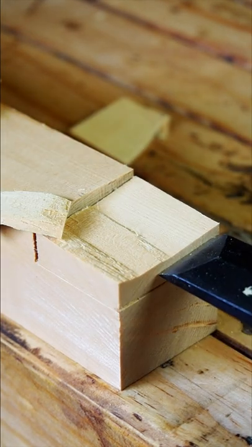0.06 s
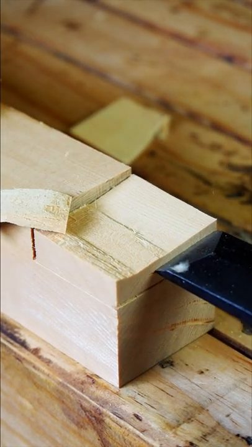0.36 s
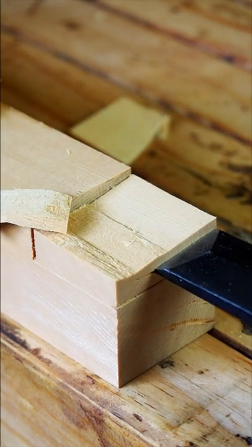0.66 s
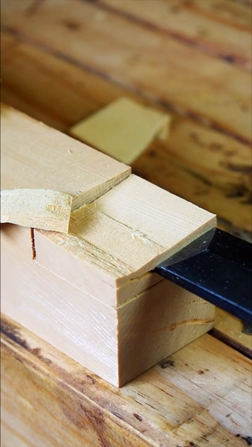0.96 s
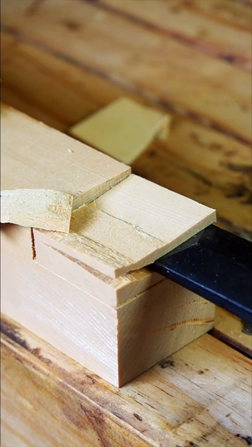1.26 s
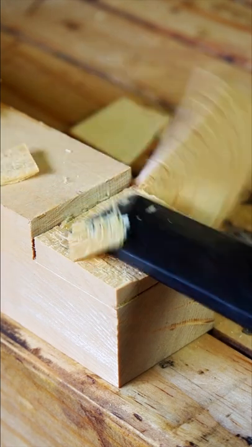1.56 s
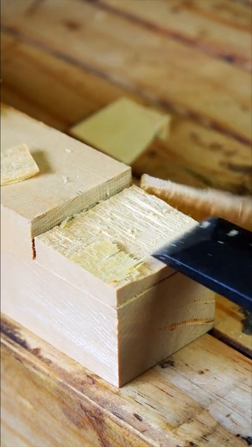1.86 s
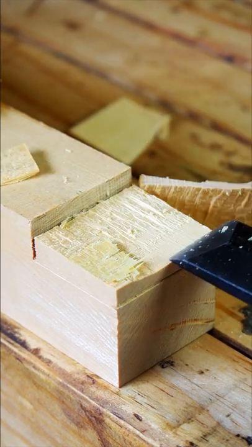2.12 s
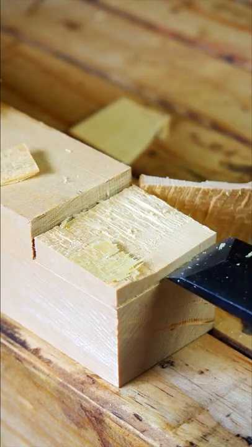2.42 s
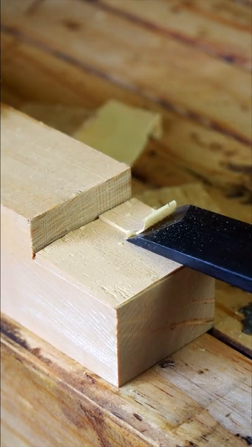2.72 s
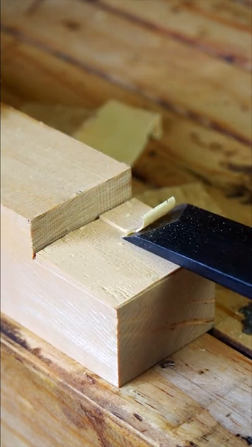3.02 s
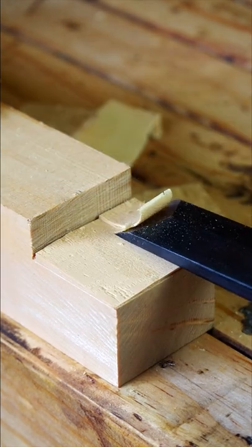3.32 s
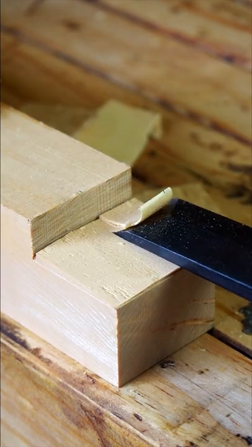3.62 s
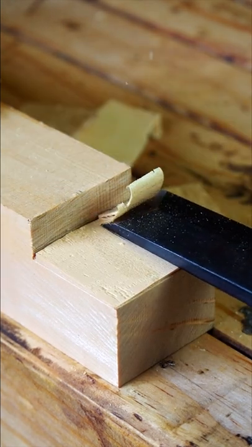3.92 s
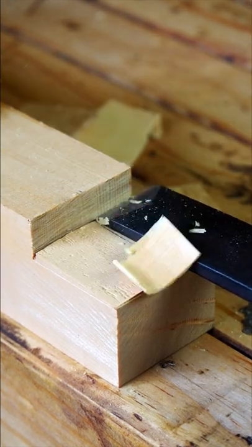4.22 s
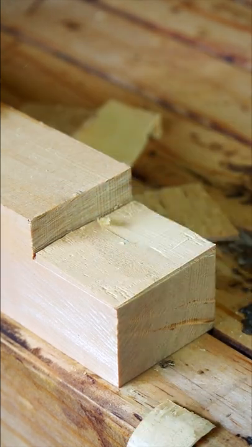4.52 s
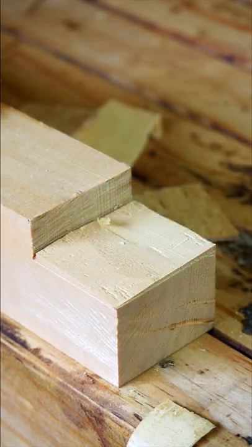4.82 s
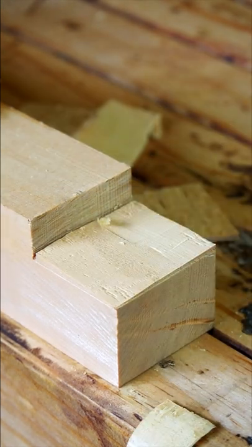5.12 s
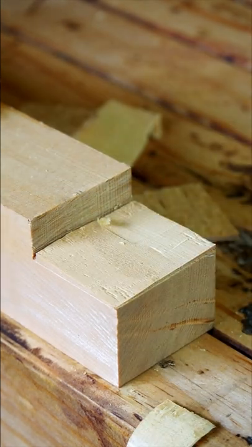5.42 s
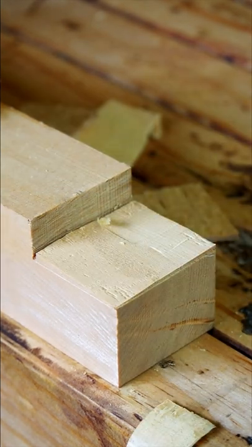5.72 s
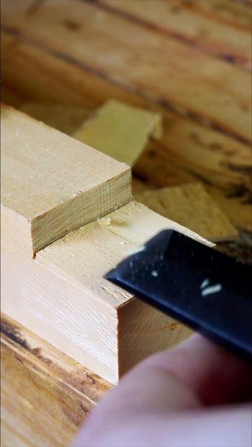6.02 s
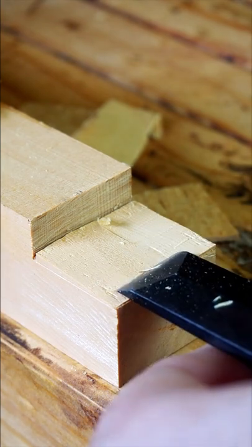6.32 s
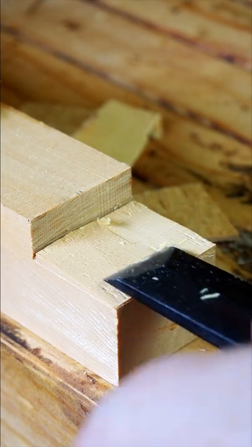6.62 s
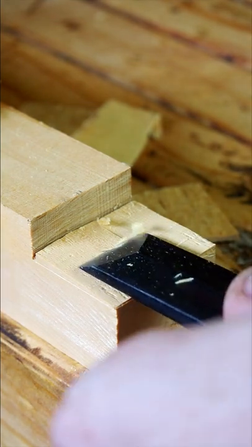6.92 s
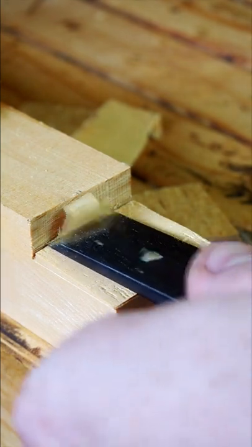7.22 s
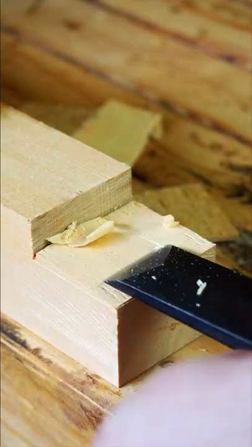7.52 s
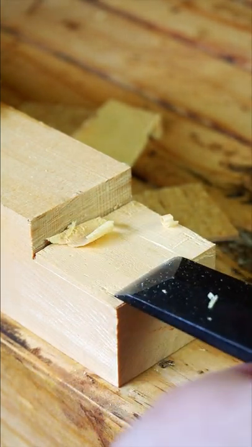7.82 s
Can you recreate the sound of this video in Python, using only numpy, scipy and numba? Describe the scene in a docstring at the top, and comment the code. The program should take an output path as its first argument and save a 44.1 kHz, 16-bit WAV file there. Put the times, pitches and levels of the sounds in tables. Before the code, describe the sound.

Two runs of close mallet taps on a chisel, heavy then lighter, crack wood fibres in a workshop before tool knocks and scraping.

```python
"""In a live workshop a mallet drives a chisel across the grain of a softwood block; each impact rings
damped modes and cracks fibres, and a nearby phone's limiter ducks, then lets the room swell back.
A chip flies off, and a lighter, quicker run of taps follows as a low drone comes up. The mallet is laid
on the bench, and the blade is set back on the wood with a short chatter. A hand brushes the phone's left
port while the chisel is pushed on, hissing with friction, until it meets the shoulder with a clack."""
import sys
import numpy as np
from scipy import signal
from scipy.fft import rfft, irfft
from scipy.io import wavfile
from scipy.ndimage import uniform_filter1d
from numba import njit

SR = 44100
rng = np.random.default_rng(int(sys.argv[2]) if len(sys.argv) > 2 else 0)


def dump_mix(stems):
    """Bounce the given channels to the path in sys.argv[1] as a 16-bit WAV at rate SR."""
    frames = np.atleast_2d(stems).T  # one column per channel
    limited = np.clip(frames, -1, 1)  # hard clip at full scale
    pcm = np.round(limited * 32767).astype(np.int16)
    wavfile.write(sys.argv[1], SR, pcm)


N = 351036
T = np.arange(N) / SR
HIT_T = T[:SR // 5]  # time axis of one impact
LEAD = SR // 4  # samples before time zero, so that the room is already ringing


def undb(db):
    """Amplitude ratio of a level in decibels."""
    return 10 ** (np.asarray(db) / 20)


def along(table, hz):
    """Interpolation of a (frequency, value) table on a logarithmic frequency axis."""
    return np.interp(np.log(hz + 1), np.log([row[0] for row in table]), [row[1] for row in table])


def fade(t, t60):
    """Exponential damping: 60 dB of decay in t60 seconds."""
    return np.exp(-np.log(1000) * t / t60)


def add(out, s, x):
    """Superposition: x enters at time s on a track that starts LEAD samples early."""
    i = int(s * SR) + LEAD
    out[..., i:i + x.shape[-1]] += x[..., :LEAD + N - i]


# Stereo width at the phone's two ports: (frequency [Hz], side level against mid [dB])
STEREO_WIDTH = [(60, -11), (200, -12), (700, -6), (1300, -5), (2400, -1), (4400, 1.5), (8500, -.5),
                (14000, -4)]

def noise(spectrum, size):
    """Partial coherence: coloured stereo noise of unit rms, its long waves alike at both ports."""
    hz = np.fft.rfftfreq(size, 1 / SR)
    mid, side = rfft(rng.standard_normal((2, size)))
    width = undb(along(STEREO_WIDTH, hz))
    ports = (mid + np.array([[1], [-1]]) * width * side) / np.hypot(1, width)
    x = irfft(ports * undb(along(spectrum, hz)), size)
    return x / x.std()


def burst(spectrum, t60):
    """Broadband transient: decaying noise with a smoothed spectrum and the energy of 1 ms at unit rms."""
    hz = np.fft.rfftfreq(len(HIT_T), 1 / SR)
    raw = rfft(noise(spectrum, len(HIT_T)) * fade(HIT_T, t60))
    x = irfft(raw / np.abs(raw) * undb(along(spectrum, hz)), len(HIT_T)) * fade(HIT_T, 10 * t60)
    return x / np.sqrt(np.sum(x ** 2) / 2 / (SR / 1000))


def ring(modes, contact_hz, heft_db=0, off_centre_db=0, bass_hz=600):
    """Modal vibration: soft contact cuts high modes, heft feeds low ones, aim favours alternate ones."""
    x = 0
    for k, (hz, db, t60) in enumerate(modes):
        scatter_db, detune = rng.standard_normal(2)
        gain = undb(db + scatter_db + heft_db * (hz < bass_hz) - off_centre_db * (-1) ** k)
        sine = np.sin(2 * np.pi * hz * (1 + 0.014 * detune) * HIT_T)
        x = x + (-1) ** (k // 2) * gain * fade(HIT_T, t60) * sine
    return signal.sosfilt(signal.butter(2, min(contact_hz, SR / 3), fs=SR, output="sos"), x)


# Crack of crushed wood: (frequency [Hz], spectral density [dB])
CRACK_SPECTRUM = [(40, -10.5), (600, -19), (2500, -3), (3600, -7.5), (4600, 0.5), (5800, -9.5), (7600, 1),
                  (8300, -10), (8900, 2.5), (9600, -5), (12000, -12.5), (13700, -12), (16000, -12)]

def blow(modes, contact_hz, crack_db, crack_t60, left_lag_s, heft_db, off_centre_db):
    """Impact excitation: a crack of crushed wood, and ringing modes that reach the left port later."""
    body = ring(modes, contact_hz, heft_db, off_centre_db)
    left = np.interp(HIT_T - left_lag_s, HIT_T, body)
    return np.array([left, body]) + undb(crack_db) * burst(CRACK_SPECTRUM, crack_t60)


# Mallet taps, a heavy run and a lighter one: (time [s], force level [dB], crack against force [dB])
MALLET_TAPS = [(-0.145, 7.5, -13), (0.097, 9, -0.5), (0.3372, 10, -9), (0.6078, 11.5, -2.5),
               (0.8519, 9, -1), (1.0923, 11, -3.5), (1.3267, 17, -7), (2.7185, -.5, -14),
               (2.9248, 3.5, -10), (3.1254, 3.5, -6.5), (3.3194, 0.5, 5), (3.4990, 0.5, 1), (3.6817, 2, -3),
               (3.8657, 2.5, 5), (4.0603, 1, 5.5), (4.2659, 3.5, -3.5)]
# Modes of the chisel in the block: (frequency [Hz], level [dB], decay time T60 [s])
CHISEL_MODES = [(156.4, -27.5, 0.045), (346, -33, 0.021), (843, -11.5, 0.014), (991, -5, 0.016),
                (1206, -3.5, 0.023), (1490, -2.5, 0.0069), (2314, 4, 0.0057), (2770, 3, 0.0041),
                (3720, -6, 0.0064)]
# Rasp of tearing fibres: (frequency [Hz], spectral density [dB])
TEAR_SPECTRUM = [(1000, -10), (3000, -4), (5200, -8), (7600, -0.5), (9000, -0.5), (11500, -8), (14000, -6),
                 (16000, -12)]

def taps(off_centre_db=-1, aim_db=1.5, tear_db=-11, tear_t60=0.42):
    """Contact stiffness: force brightens a mallet tap, while yielding fibres cushion it and tear on."""
    base_contact_hz, harden_oct_per_db, give_oct_per_db = 3100, 0.04, 0.045
    loosen_oct_per_db = 0.0657  # a heavier tap shakes the block loose, so it rings longer
    out = np.zeros((2, LEAD + N))
    for s, force_db, crack_db in MALLET_TAPS:
        contact_hz = base_contact_hz * 2 ** (harden_oct_per_db * force_db - give_oct_per_db * crack_db)
        miss_db = off_centre_db + aim_db * rng.standard_normal()
        modes = [(hz, db, t60 * 2 ** (loosen_oct_per_db * force_db)) for hz, db, t60 in CHISEL_MODES]
        hit = blow(modes, contact_hz, crack_db, crack_t60=0.0095,
                   left_lag_s=0.00008, heft_db=-2, off_centre_db=miss_db)
        taper = np.linspace(1, 0, len(HIT_T)) ** 0.5
        tear = undb(crack_db + tear_db) * burst(TEAR_SPECTRUM, tear_t60) * taper
        add(out, s, undb(force_db) * (hit + tear))
    return out


# Echoes from the bench, a near wall and the far wall: (delay [s], level [dB])
EARLY_ECHOES = [(.0083, -14), (0.0187, -23), (0.085, -27.5)]

def reflections(x, dull_hz=2200):
    """Early reflection: each surface returns a delayed, dulled copy of the sound."""
    dull = signal.sosfilt(signal.butter(2, dull_hz, fs=SR, output="sos"), x)
    return sum(undb(db) * np.roll(dull, int(delay * SR), axis=1) for delay, db in EARLY_ECHOES)


# Reverberation of the workshop: (band centre [Hz], level [dB], decay time T60 [s])
ROOM_BANDS = [(50, -26, 0.89), (98, -15, 0.87), (153, 6, 1), (249, 7, 0.45), (390, 10, 0.53),
              (590, 1, 0.68), (855, 3, 0.57), (1510, 0, 0.59), (2360, -5.5, 0.5), (4470, -6, 0.48),
              (8700, -5, 0.36), (15300, -15, 0.24)]

def workshop(x, wet_db=-33, build_s=0.012, slap_db=-1, slap_s=0.0927):
    """Reverberation: a diffuse field builds up quickly and decays at its own rate in each band."""
    t = T[:SR]
    hz = np.fft.rfftfreq(SR, 1 / SR)
    diffuse = rfft(noise([(20, 0), (SR / 2, 0)], SR))
    # the far wall sends back a cluster of reflections; its clutter scatters the treble
    slap = undb(slap_db) * np.exp(-0.5 * ((t - slap_s) / (slap_s / 10)) ** 2)
    tail = 0
    for share, (centre_hz, db, t60) in zip(np.eye(len(ROOM_BANDS)), ROOM_BANDS):
        band = np.interp(np.log(hz + 1), np.log([row[0] for row in ROOM_BANDS]), share)
        envelope = undb(db) * fade(t, t60) * (1 + slap * (centre_hz < 2000))
        tail = tail + irfft(diffuse * band, SR) * envelope
    response = tail * (1 - np.exp(-t / build_s))
    return undb(wet_db) * signal.fftconvolve(x, response, axes=1)[:, :LEAD + N]


# Room air: (frequency [Hz], spectral density [dB])
AIR_SPECTRUM = [(30, -5), (90, 7.5), (250, 0), (480, -4), (640, -9.5), (850, -1.5), (1100, -4.5),
                (1600, -11), (2700, -18), (3700, -16.5), (6000, -24), (8000, -23.5), (12000, -28),
                (14000, -19), (16000, -26)]
# Drone of the building: (frequency [Hz], spectral density [dB])
DRONE_SPECTRUM = [(25, -40), (52, 1.5), (105, -3.5), (130, 6), (175, 0), (240, -23), (330, -8),
                  (700, -45.5)]
# Course of the drone: (time [s], level [dB])
DRONE_LEVELS = [(0, -42), (2.5, -53.5), (2.9, -34.5), (4.5, -38.5), (6, -39), (7.96, -37)]

def background(air_db=-43):
    """Ambient noise: steady room air and a low drone that sinks, then comes up with the second run."""
    drone_db = np.interp(T, *np.transpose(DRONE_LEVELS))
    return undb(air_db) * noise(AIR_SPECTRUM, N) + undb(drone_db) * noise(DRONE_SPECTRUM, N)


# Snapping fibres and falling chips: (time [s], level [dB], centre [Hz], decay time T60 [s])
SNAP_TICKS = [(1.6070, -9.5, 2520, 0.035), (1.6294, -28, 3770, 0.028), (1.9013, -31, 2880, 0.055),
              (5.1645, -22, 9900, .01), (5.318, -22, 7100, 0.016), (7.1955, 2, 15100, 0.011)]
# Crackle of handled chips and of fibres under the edge: (start [s], end [s], level [dB], centre [Hz])
CRACKLE_SPELLS = [(4.981, 5.304, -29.5, 8900), (7.15, 7.186, -28.5, 13400)]

def snaps(pan_db=-2, crackle_t60=0.011, scatter_db=3, ticks_per_spell=5):
    """Fracture and small impacts: fibres and chips give dry ticks, singly or in random spells."""
    out, ticks = np.zeros((2, LEAD + N)), list(SNAP_TICKS)
    for start, end, db, hz in CRACKLE_SPELLS:
        for _ in range(ticks_per_spell):
            s = start + (end - start) * rng.random()
            ticks.append((s, db + scatter_db * rng.standard_normal(), hz, crackle_t60))
    for s, db, hz, t60 in ticks:
        add(out, s, undb(db) * burst([(hz / 5, -24), (hz, 0), (hz * 3, -22)], t60))
    return out * undb([[pan_db], [-pan_db]])


# Mallet and hands on the bench: (time [s], level [dB], contact cut-off [Hz], off-centre bias [dB])
BENCH_KNOCKS = [(1.953, -27, 1200, 2.5), (2.545, -25.5, 345, 2), (4.8731, -2, 5630, -1.5),
                (4.9239, -11.5, 2590, -3.5), (4.9560, -13, 1980, 1), (5.1329, -2.5, 1680, 2),
                (5.165, -10, 1150, 3.5), (5.2326, -23, 700, 4)]
# Modes of the bench: (frequency [Hz], level [dB], decay time T60 [s])
BENCH_MODES = [(174.4, -25, 0.072), (263, -16, 0.067), (415, -13, 0.046), (498, -21, 0.068),
               (770, -8.5, 0.028), (889, -8, 0.043), (1187, -2, 0.0095), (1496, -17.5, 0.062),
               (1973, -4, 0.028), (2310, -5, 0.03), (3600, -16, 0.13), (3830, -3, 0.016), (4130, -22, 0.13),
               (4810, -3, 0.014)]

def knocks(crack_at_1khz_db=-18, crack_db_per_oct=5):
    """Contact hardness: the harder a thing lands on the bench, the wider its band and the more crack."""
    out = np.zeros((2, LEAD + N))
    for s, db, contact_hz, off_centre_db in BENCH_KNOCKS:
        crack_db = crack_at_1khz_db + crack_db_per_oct * np.log2(contact_hz / 1000)
        knock = blow(BENCH_MODES, contact_hz, crack_db, crack_t60=0.086,
                     left_lag_s=0.00002, heft_db=2.5, off_centre_db=off_centre_db)
        add(out, s, undb(db) * knock)
    return out


def strokes(events):
    """Exponential growth and decay: the summed envelope of sliding strokes."""
    return sum(undb(db) * np.exp(np.minimum((T - s) / rise, (s - T) / fall))
               for s, rise, fall, db in events)


# Steel sliding over wood: (peak time [s], rise [s], fall [s], level [dB])
STEEL_STROKES = [(4.53, 0.19, 0.14, -48.5), (6.11, 0.023, 0.087, -37.5), (6.75, 0.27, 0.21, -51),
                 (7.235, 0.059, 0.045, -32), (7.44, .07, 0.071, -44.5), (7.92, 0.047, .06, -46.5)]
# Skin brushing over the tools: (peak time [s], rise [s], fall [s], level [dB])
SKIN_STROKES = [(4.95, 0.13, 0.094, -35), (5.30, 0.15, 0.11, -40), (5.54, 0.06, 0.12, -44.5),
                (6.01, 0.039, .04, -40.5), (6.10, 0.013, 0.013, -28.5), (6.263, 0.034, .04, -36.5),
                (6.955, 0.019, 0.073, -43)]
# Hiss of either kind of stroke: (frequency [Hz], spectral density [dB])
HISS_SPECTRUM = [(1500, 8.5), (4000, 2.5), (6000, 4), (8500, 8), (12000, 0.5), (14000, 7.5), (16000, -11)]
# Lower rasp of steel alone: (frequency [Hz], spectral density [dB])
RASP_SPECTRUM = [(700, -2), (1600, -0.5), (2600, -7), (3700, 1.5), (5000, -6.5), (9000, -45)]

def slides(grain_db=2.5, rasp_db=2):
    """Friction noise: sliding catches on fibre after fibre in a grainy hiss; steel adds a lower rasp."""
    steel, skin = strokes(STEEL_STROKES), strokes(SKIN_STROKES)
    grain_times = T[::64]
    grain = undb(grain_db * np.interp(T, grain_times, rng.standard_normal(len(grain_times))))
    hiss = (steel + skin) * noise(HISS_SPECTRUM, N)
    rasp = undb(rasp_db) * steel * noise(RASP_SPECTRUM, N)
    return grain / np.sqrt(np.mean(grain ** 2)) * (hiss + rasp)


# Modes of the block under the blade: (frequency [Hz], level [dB], decay time T60 [s])
BLOCK_MODES = [(188, -12, 0.046), (320, -31, 0.11), (845, -3, 0.057), (994, -6, 0.085), (1680, 0.5, 0.038),
               (1770, -24, 0.068), (2110, -11, 0.038), (3520, -6, 0.044)]

def set_down(start_s=6.1054, db=-12, gap_s=0.0056, loss_db=5, touches=3):
    """Inelastic rebound: the blade chatters as it is set on the block, weaker at each touch."""
    out = np.zeros((2, LEAD + N))
    for k in range(touches):
        touch = blow(BLOCK_MODES, contact_hz=2500, crack_db=-4, crack_t60=0.039,
                     left_lag_s=0.00005, heft_db=3, off_centre_db=-1)
        add(out, start_s + k * gap_s, undb(db - k * loss_db) * touch)
    return out


# A hand bumping the left port: (time [s], level [dB], contact cut-off [Hz])
HAND_BUMPS = [(6.694, -3, 226), (6.809, -4, 203), (6.903, -4.5, 456), (6.954, 1.5, 219), (6.973, 0.5, 620),
              (7.003, -0.5, 240), (7.049, -5, 140)]
# Modes of the port: (frequency [Hz], level [dB], decay time T60 [s])
PORT_MODES = [(129, 0, 0.051), (294, -6.5, 0.036), (480, 12.5, 0.0029)]

def bumps(right_db=-24, low_cut_hz=80, judders=2, judder_s=0.01795, judder_db=-8.5, judder_hz=231):
    """Handling noise: dull thumps amid small judders of the skin, almost wholly at the left port."""
    out = np.zeros(LEAD + N)
    for s, db, contact_hz in HAND_BUMPS:
        add(out, s, undb(db) * ring(PORT_MODES, contact_hz))
        for offset in rng.uniform(-1.012, 1, judders):
            add(out, s + judder_s * offset, undb(db + judder_db) * ring(PORT_MODES, judder_hz))
    low_cut = signal.butter(2, low_cut_hz, "high", fs=SR, output="sos")
    return signal.sosfilt(low_cut, out) * undb([[0], [right_db]])


# Modes of the edge meeting the shoulder: (frequency [Hz], level [dB], decay time T60 [s])
SHOULDER_MODES = [(166, -20, 0.092), (335, -16.5, 0.05), (860, -1, 0.014), (1030, -3.5, 0.036),
                  (1220, -2, 0.029), (1350, -0.5, 0.023), (1850, -17, .015), (2170, 0, 0.017)]

def shoulder(stop_s=7.24, db=1):
    """Sudden deceleration: the hand-pushed edge stops against the shoulder with one dull clack."""
    out = np.zeros((2, LEAD + N))
    clack = blow(SHOULDER_MODES, contact_hz=1720, crack_db=-14, crack_t60=0.026,
                 left_lag_s=0.00005, heft_db=2, off_centre_db=-1)
    add(out, stop_s, undb(db) * clack)
    return out


def scene():
    """Direct and reverberant fields: the work is close, and each source stirs the room by its own share."""
    chisel, bench, blade, stop = taps(), knocks(), set_down(), shoulder()
    ticks_and_hiss = snaps() + np.pad(slides(), ((0, 0), (LEAD, 0)))
    room = workshop(chisel + bench + undb(-4) * (blade + ticks_and_hiss) + undb(-7.5) * stop)
    direct = chisel + bench + blade + stop + ticks_and_hiss + bumps()
    return (direct + reflections(chisel) + room)[:, LEAD:] + background()


@njit
def peak_follow(x, keep):
    """Peak detection: the envelope jumps to each peak, then sinks exponentially."""
    out, held = np.empty(len(x)), 0.
    for i in range(len(x)):
        held = max(x[i], held * keep)
        out[i] = held
    return out


def duck(x, ceiling, release_s):
    """Peak limiting: the gain in dB that holds the peaks of x at the ceiling."""
    peak = peak_follow(np.abs(x).max(axis=0), np.exp(-1 / (release_s * SR)))
    return 20 * np.log10(ceiling / np.maximum(peak, ceiling))


def record(dry, attack_s=0.0086, top_hz=16300):
    """Dynamic compression: slow gain control, a fast limiter for what slips through, then a treble cut."""
    keep = np.exp(-1 / (attack_s * SR))
    slow_db = signal.lfilter([1 - keep], [1, -keep], duck(dry, ceiling=1.188, release_s=0.1))
    ducked = dry * undb(slow_db)
    fast_db = uniform_filter1d(duck(ducked, ceiling=1.41, release_s=0.0021), size=16)
    limited = np.clip(ducked * undb(fast_db), -1, 1)
    return signal.sosfilt(signal.ellip(8, 0.2, 70, top_hz, fs=SR, output="sos"), limited)


dry = scene()
out = record(dry)
dump_mix(out)
```